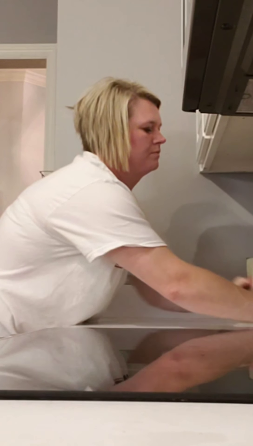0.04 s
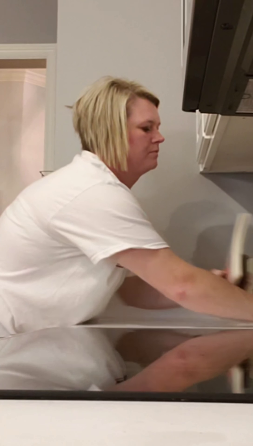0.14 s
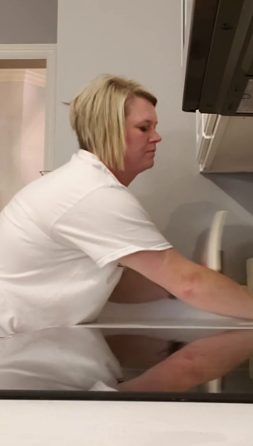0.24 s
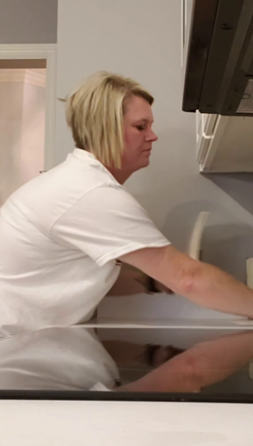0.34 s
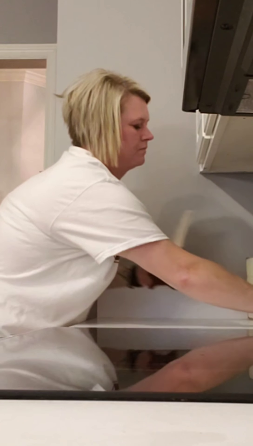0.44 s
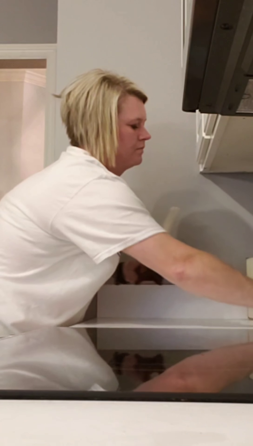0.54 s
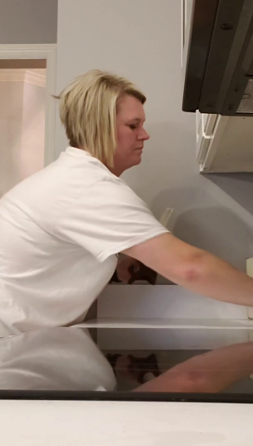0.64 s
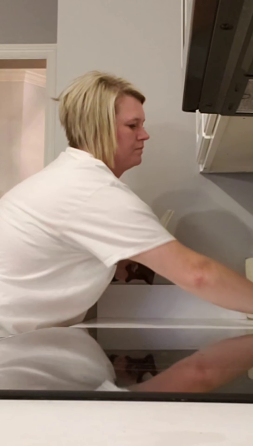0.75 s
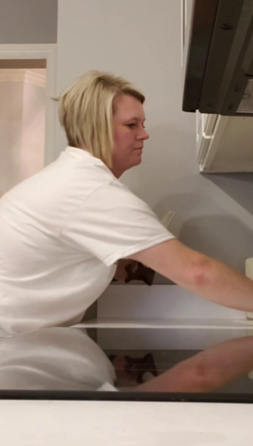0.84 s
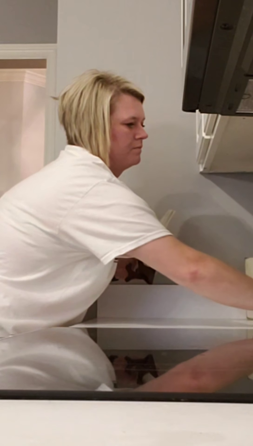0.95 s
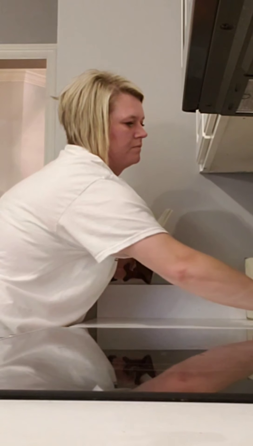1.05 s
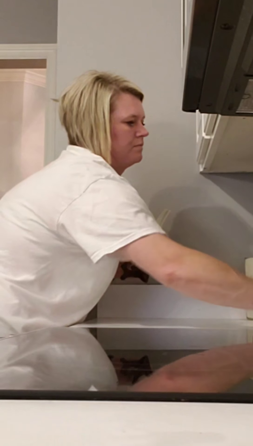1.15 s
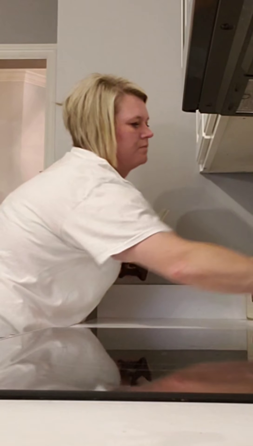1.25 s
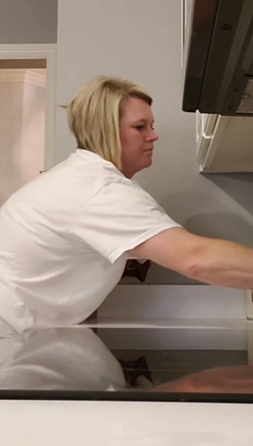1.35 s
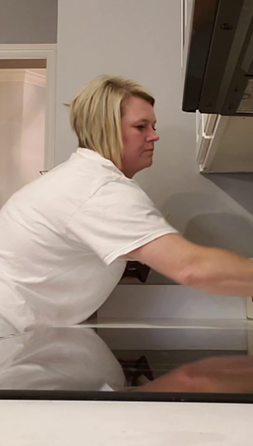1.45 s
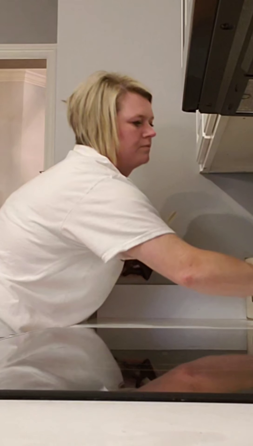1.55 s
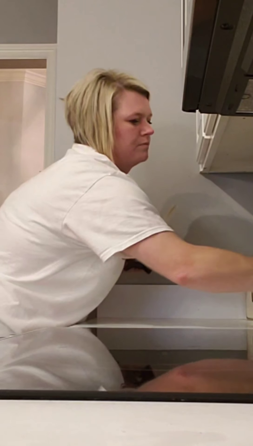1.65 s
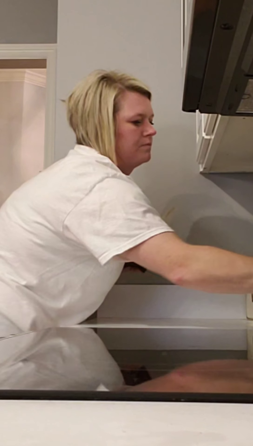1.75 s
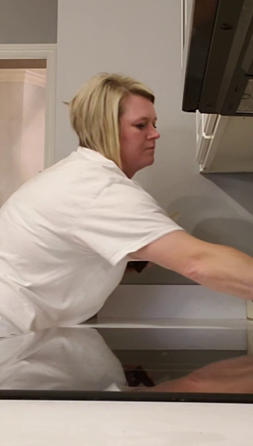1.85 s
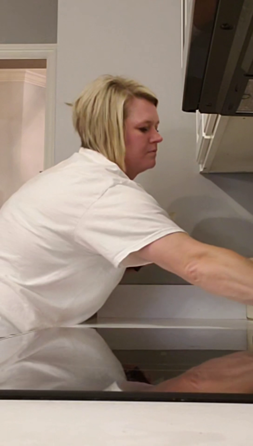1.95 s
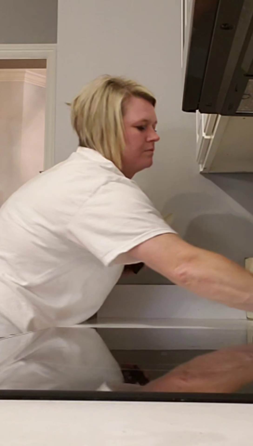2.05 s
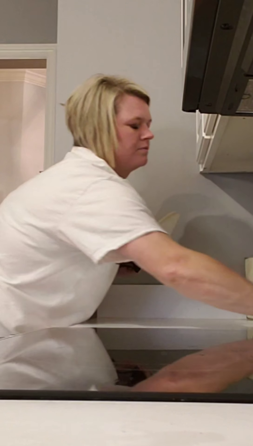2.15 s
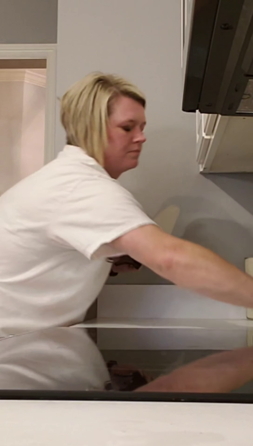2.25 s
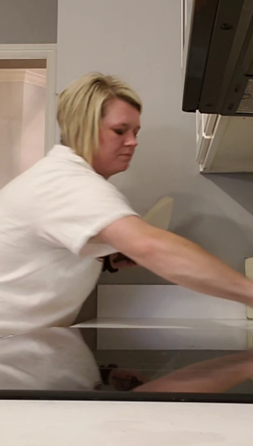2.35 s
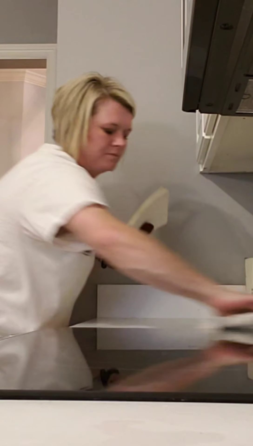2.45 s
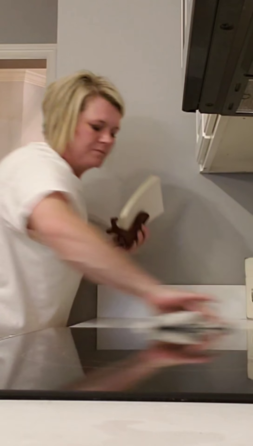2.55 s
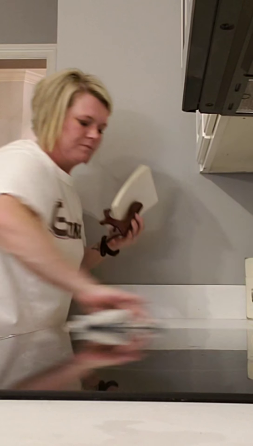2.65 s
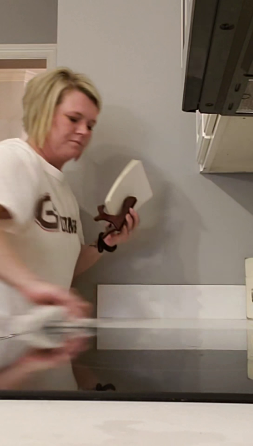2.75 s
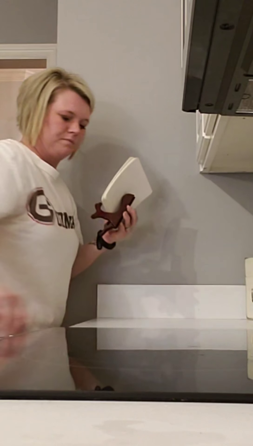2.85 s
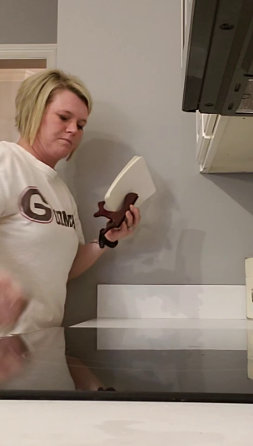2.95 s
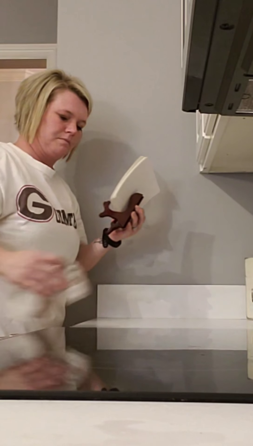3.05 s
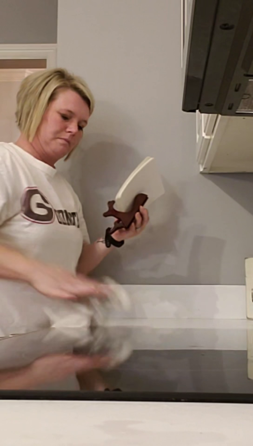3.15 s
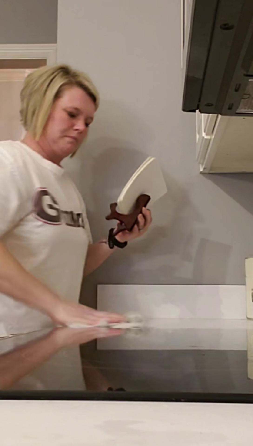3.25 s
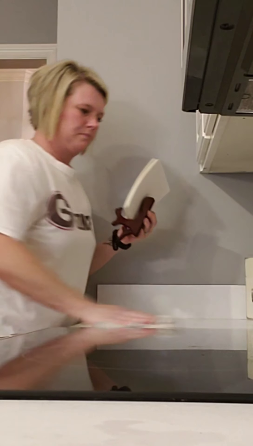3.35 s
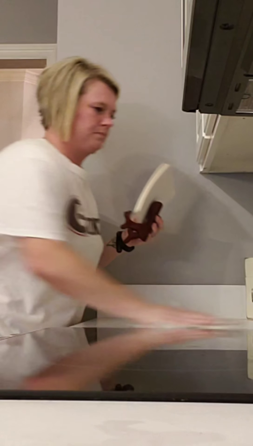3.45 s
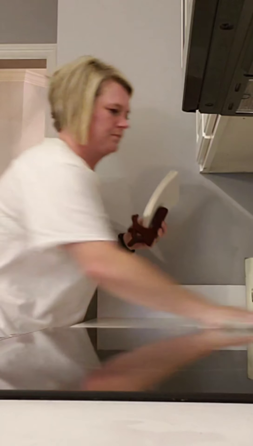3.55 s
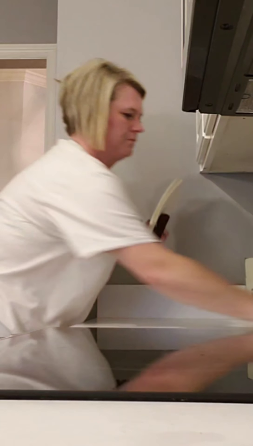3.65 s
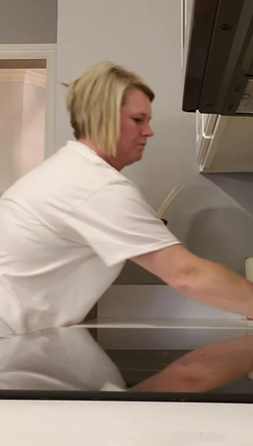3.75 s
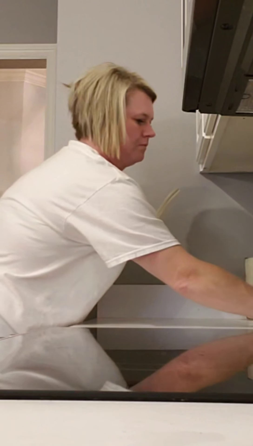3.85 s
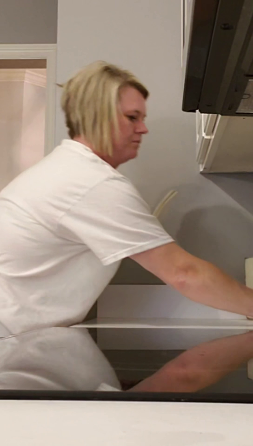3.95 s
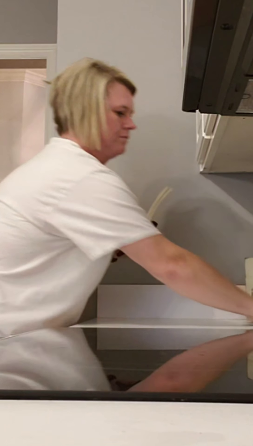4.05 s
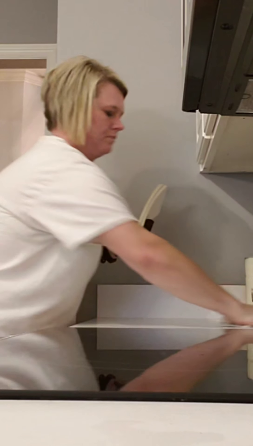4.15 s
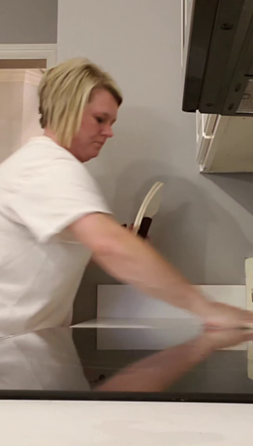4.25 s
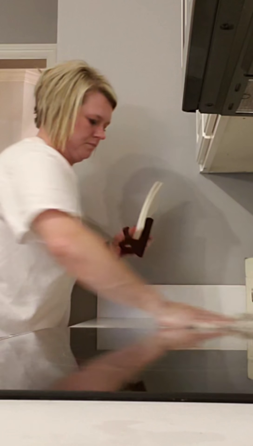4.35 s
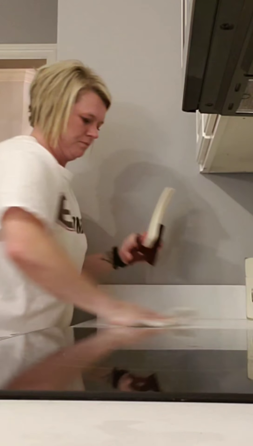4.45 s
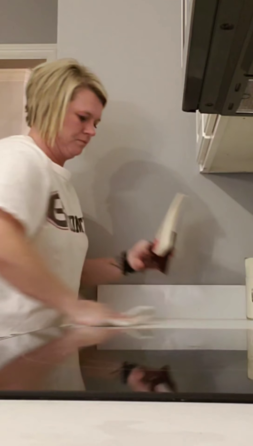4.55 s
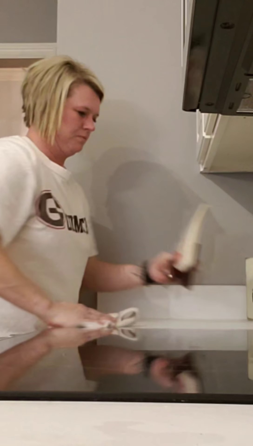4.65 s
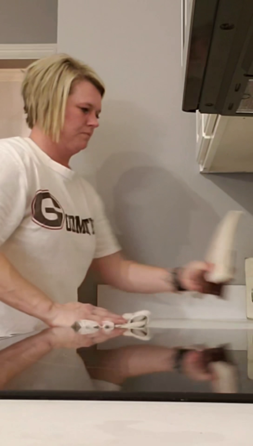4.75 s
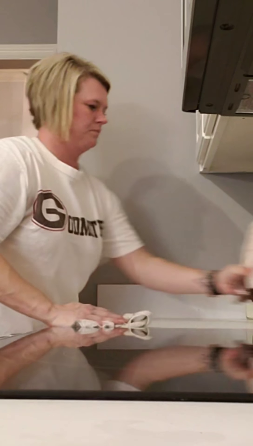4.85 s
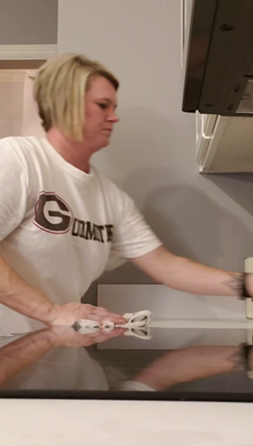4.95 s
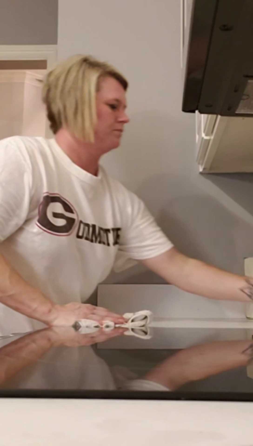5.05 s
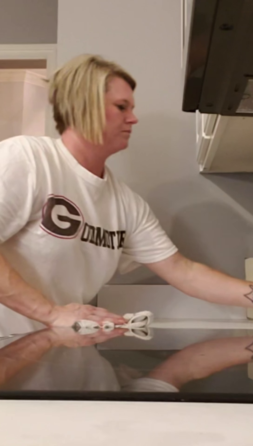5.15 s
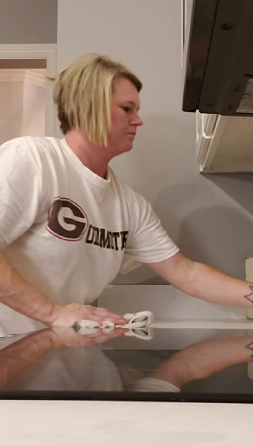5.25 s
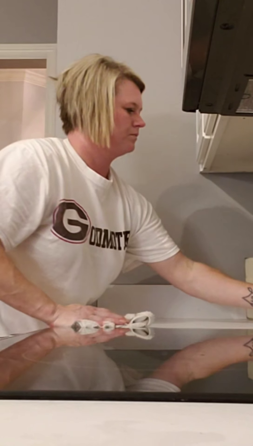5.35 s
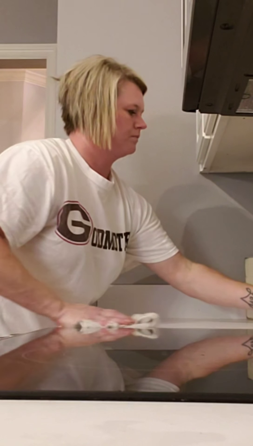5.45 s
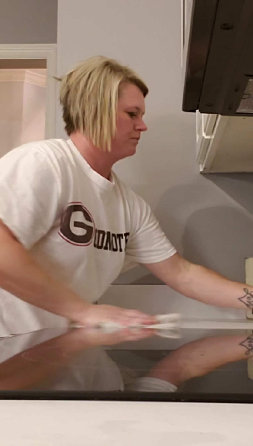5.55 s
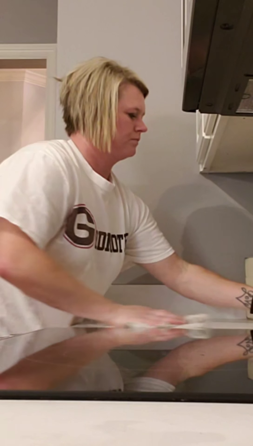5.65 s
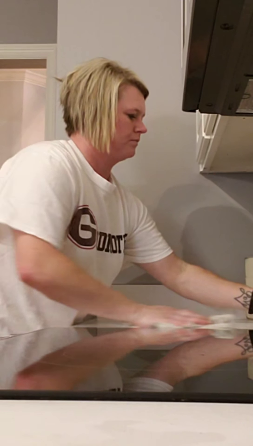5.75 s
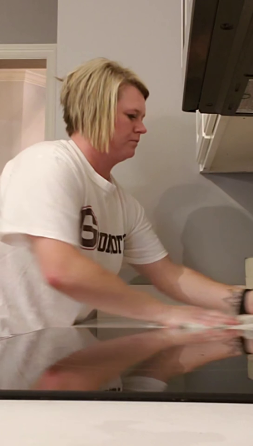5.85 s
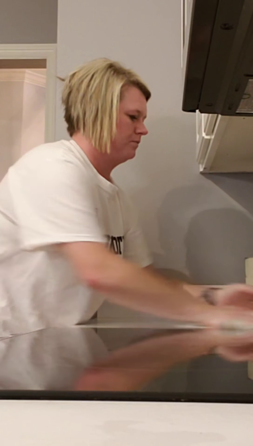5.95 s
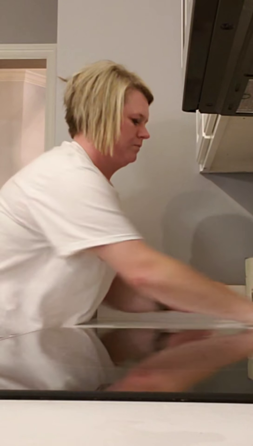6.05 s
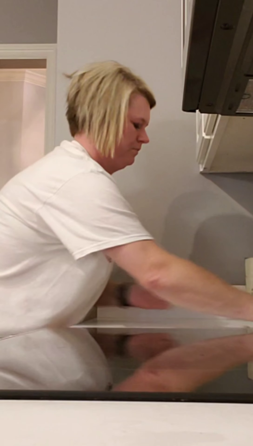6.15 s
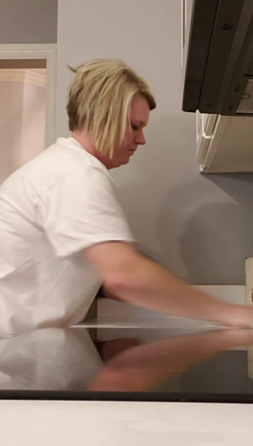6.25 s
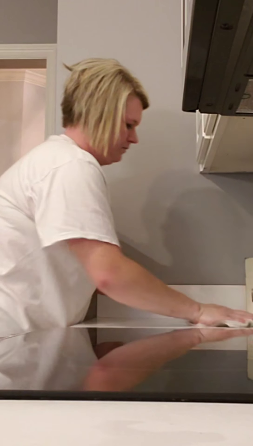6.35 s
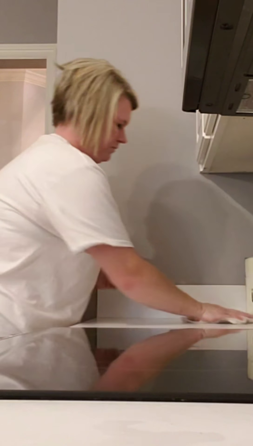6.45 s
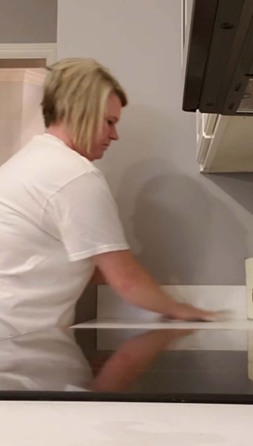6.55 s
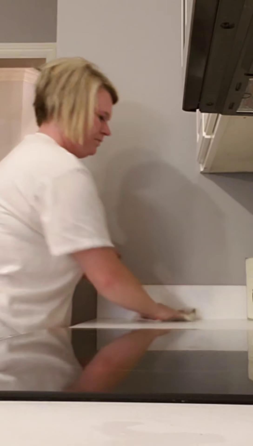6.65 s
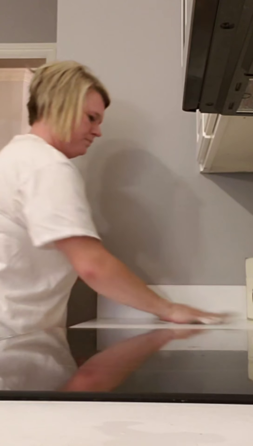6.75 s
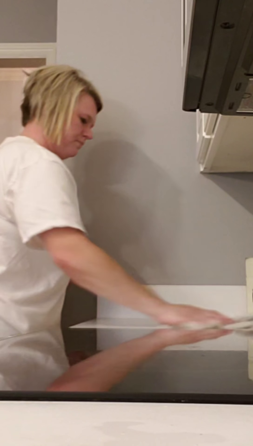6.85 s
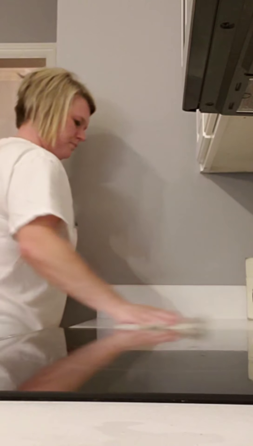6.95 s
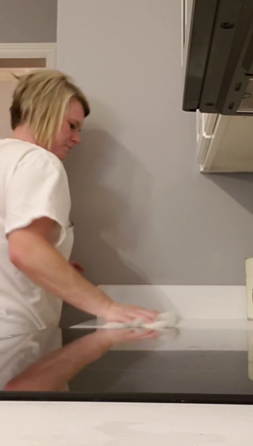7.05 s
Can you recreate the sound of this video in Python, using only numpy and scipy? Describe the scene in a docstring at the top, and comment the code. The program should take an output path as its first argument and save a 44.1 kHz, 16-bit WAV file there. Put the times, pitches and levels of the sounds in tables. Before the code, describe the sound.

A damp rag swishes to and fro over a countertop in uneven strokes, with a few soft squeaks and light bumps of the hand. About five seconds in, a heavy board is set down with one loud knock, then rocks briefly and settles. The wiping resumes. A refrigerator hums steadily throughout, and everything sounds nearby in a hard, slightly reverberant kitchen.

```python
"""A damp rag swishes to and fro over a kitchen countertop, above a refrigerator's steady hum.
The swish is friction noise: countless threads catch and slip, and now and then squeak softly.
A heavy board in a stand is set down with one loud knock, rocks and settles; these impacts, and light
bumps of the wiping hand, excite damped modes of board and counter, which reverberate in the hard room.
The refrigerator adds a line spectrum from its motor, broadband fan noise and a faint whine."""
import sys
import numpy as np
from scipy import signal
from scipy.fft import rfft, irfft, next_fast_len
from scipy.io import wavfile
from scipy.ndimage import uniform_filter1d, map_coordinates

SR = 44100
rng = np.random.default_rng(int(sys.argv[2]) if len(sys.argv) > 2 else 0)


def unload_audio(sound):
    """Save the sound as a 16-bit wav file, at the path given as the first command line argument."""
    columns = np.transpose(np.atleast_2d(sound))
    # keep every value between -1 and 1, then stretch to whole-number steps
    steps = np.round(np.clip(columns, -1, 1) * 32767)
    wavfile.write(sys.argv[1], SR, steps.astype(np.int16))


N = 312669

# partials of the refrigerator motor: f/Hz, rms level/dB
MOTOR_LINES = [(59.3, -59), (79.6, -60), (120, -45), (239.7, -55.5), (319.7, -63), (359.5, -65.5),
               (595.8, -67), (636, -74.5), (675, -71.5), (715.4, -68), (755, -70), (836.3, -73.5)]
# fan noise: f/Hz, relative level/dB
FAN_SPECTRUM = [(25, -34), (48, -31), (80, -10), (110, 2), (200, -3.5), (260, -8.5), (480, -11.5),
                (760, -17.5), (950, -21), (1200, -20), (1400, -31), (1800, -34), (6800, -33), (9000, -47),
                (15800, -47.5)]
# fan noise: f/Hz, left-right coherence
FAN_COHERENCE = [(130, 0.85), (300, 0.86), (700, 0.057), (1400, 0.027), (4000, 0.075)]
# fan noise: f/Hz, left minus right level/dB
FAN_BALANCE = [(100, 4), (700, 1), (1300, 4), (2400, 4.5), (7000, 6), (12000, -3)]
# noise bands of the refrigerator's whine: f/Hz, width/Hz, relative level/dB
WHINE_BANDS = [(2830, 270, -7), (3270, 100, -2), (3520, 110, -2)]
# reverberation time of the kitchen: f/Hz, T60/s
ROOM_DECAY = [(120, 0.4), (400, 0.69), (1500, 0.53), (3000, 0.47), (6000, 0.28), (14000, 0.19)]
# modes of board and counter: f/Hz, relative level/dB, T60/s
COUNTER_MODES = [(112, -17, .15), (183, -11, .15), (345, -21, .12), (392.5, 0, .115), (447, -22, .12),
                 (614, -6.5, .08), (664, -8, .11), (738, -12, .1), (843, -16, .1), (983, -15, .1),
                 (1150, -4.5, .075), (1295, -9, .075), (1502, -15, .07), (1598, -5, .075), (1680, -17, .09),
                 (1808, -12, .085), (1940, -23, .07), (2210, -21, .06), (2870, -22, .05), (3010, -22, .05),
                 (3260, -24, .05)]
# noise burst of an impact: f/Hz, relative level/dB
CRACK_SPECTRUM = [(80, -24), (180, -10), (280, -6), (420, -11), (700, 6.5), (950, -8.5), (1250, -1.5),
                  (1650, 1.5), (2100, -10.5), (3200, -10.5), (4200, -19), (5600, -16.5), (8000, -23.5),
                  (14000, -31.5)]
# impacts: t/s, ring gain/dB, ring tilt/(dB per octave), crack gain/dB, contact cut-off/Hz
# the hand bumps seven times; the board lands edge first, then flat (four rows), then rocks and settles
IMPACTS = [ (0.797, -48, -6, -48.5, 2000), (0.811, -38.5, -8, -41, 650), (0.838, -44.5, -9.5, -46, 600),
           (0.866, -52, -10, -40, 330), (2.811, -45, 4.5, -43.5, 1300), (2.889, -47, -1, -44.5, 900),
           (3.314, -47, -13, -62, 130), (5.1558, -22.5, 7, -24, 5000), (5.1572, -15, 6, -23.5, 15000),
           (5.1643, -13, -1, -27.5, 12000), (5.1717, -20.5, -1.5, -32, 6000), (5.221, -31, -2, -36, 1500),
           (5.249, -30.5, -6.5, -36, 2200), (5.269, -31, 2, -29.5, 2600), (5.62, -39, 6, -44, 1800),
           (5.765, -41, 3.5, -58, 950)]
# squeaks of damp cloth: centre t/s, f/Hz, level/dB, 1/e half-length/s
CLOTH_SQUEAKS = [(1.402, 3430, -56, 0.017), (1.532, 2230, -58, 0.054), (1.53, 3300, -76, 0.053),
                 (3.304, 3400, -56.5, .025), (6.35, 3400, -60, .03)]
# strokes of the rag: start t/s, length/s, rise/s, swell/dB, scrape gain/dB, hiss gain/dB, rub gain/dB
RAG_STROKES = [(-0.048, 0.38, 0.06, -1.5, -56.0, -60.5, -58), (0.402, 0.17, 0.121, -1, -60.0, -63, -60.5),
               (0.628, 0.167, 0.066, 0.0, -79, -77.0, -74), (0.737, 0.13, 0.056, -0.0, -64.5, -67, -64),
               (0.858, 0.29, 0.071, -1.5, -61.5, -62.0, -60.0), (1.388, 0.2, 0.073, 3, -53.5, -56.5, -60.5),
               (1.865, 0.047, 0.05, 0.0, -61, -65.5, -59.0), (1.936, 0.3, 0.13, 4.5, -58.5, -61, -60.5),
               (2.284, 0.3, 0.1, -0.5, -56, -55.5, -65.5), (2.534, 0.338, 0.059, 1.5, -55.5, -56.5, -59),
               (3.293, 0.45, 0.11, 5, -57, -59.0, -60.0), (3.742, 0.21, 0.038, 7.5, -57.0, -57.5, -60),
               (3.93, 0.21, 0.052, -0.5, -56.5, -62, -60.0), (4.119, 0.27, 0.059, 3.5, -57, -56.5, -60),
               (4.378, 0.24, 0.1, -2, -55, -53.5, -59.0), (4.597, 0.19, 0.045, 3.5, -62.0, -61.5, -70),
               (5.465, 0.38, 0.073, 10, -62.0, -63.0, -67.5),
               (5.855, 0.313, 0.054, -0.5, -60.5, -61.0, -62.5), (6.21, 0.49, 0.071, 2, -57, -61.5, -60.5),
               (6.708, 0.278, 0.078, -3, -53.5, -57.5, -55.5), (6.966, 0.14, 0.082, 1, -58.5, -59.5, -67.5)]
# height of the arch at mid-stroke, where the hand is fastest: scrape/dB, hiss/dB, rub/dB
STROKE_ARCH = [2.5, 3.1, 1.7]
# scrape of the threads: f/Hz, relative level/dB
SCRAPE_SPECTRUM = [(1200, -54), (2200, -9), (3200, -1), (4600, 1), (6000, -3), (7200, -7), (9000, -18.5),
                   (15000, -26)]
# hiss of the fibres: f/Hz, relative level/dB
HISS_SPECTRUM = [(4000, -18), (7000, 0), (9200, -5), (11000, -1.5), (12800, 0.5), (14300, -2),
                 (15800, -7.5)]
# dull rub of the pressing hand: f/Hz, relative level/dB
RUB_SPECTRUM = [(250, 4.5), (600, 3.5), (1100, 3), (1600, 1.5), (2200, 3.5), (3000, -4), (4500, -20)]
# friction noise of the rag: f/Hz, left-right coherence
RAG_COHERENCE = [(300, 0.72), (700, 0.29), (1400, -0.2), (3100, -0.074), (6800, -0.11), (13000, 0.37)]

RELEASE_T60_S = 0.34  # a stroke dies away as the hand stops or turns
BAND_LIMIT_HZ = 15780


def amp(db):
    """Amplitude ratio of a level in decibels."""
    return 10 ** (np.asarray(db) / 20)


def unit(x):
    """Normalisation to rms 1."""
    return x / np.sqrt(np.mean(x ** 2) + 1e-20)


def along(points, hz):
    """Interpolation of (f/Hz, value) points on a logarithmic frequency axis."""
    f, v = np.transpose(points)
    return np.interp(np.log(hz + 1), np.log(f), v)


def wobble(rate):
    """Slow random modulation: a spline through `rate` knots a second."""
    return map_coordinates(rng.standard_normal(int(N * rate / SR) + 4), [np.arange(N) * rate / SR])


def filtered(x, response):
    """Linear filtering: the spectrum is multiplied by a frequency response."""
    n = x.shape[-1]
    m = next_fast_len(n + 8192)
    return irfft(rfft(x, m) * response(np.fft.rfftfreq(m, 1 / SR)), m)[..., :n]


def pan(left_db):
    """Left and right gains for an interchannel level difference."""
    return amp(np.array([[.5], [-.5]]) * left_db)


def spread(pair, spectrum, coherence):
    """Mid-side mixing turns two independent noises into coloured, partly coherent stereo of rms 1."""
    def response(hz):
        angle = np.arccos(np.clip(along(coherence, hz), -1, 1)) / 2
        return amp(along(spectrum, hz)) * [np.cos(angle), np.sin(angle)]
    mid, side = filtered(pair, response)
    return unit(np.array([mid + side, mid - side]))


def refrigerator():
    """Superposition of wavering motor partials, broadband fan noise and a narrow-band whine."""
    t, hum = np.arange(N) / SR, np.zeros(N)
    for hz, db in MOTOR_LINES:
        peak = np.sqrt(2) * amp(db + 0.9 * wobble(4.5))
        hum += peak * np.sin(2 * np.pi * (hz * t + rng.random()) + 0.15 * wobble(2.0))
    fan = spread(rng.standard_normal((2, N)), FAN_SPECTRUM, FAN_COHERENCE)
    fan = filtered(fan, lambda hz: pan(along(FAN_BALANCE, hz)))
    peaks = lambda f: sum(amp(db) / (1 + (2 * (f - hz) / width) ** 2) for hz, width, db in WHINE_BANDS)
    whine = unit(filtered(rng.standard_normal((2, N)), peaks)) * amp(wobble(6.5))
    return hum * pan(3.4) + amp(-47.0) * fan + amp(-67.5) * whine * pan(6.1)


def room(x, wet_db):
    """Reverberation: a diffuse tail builds up after the direct sound; each band decays at its own rate."""
    hz, t, noise = signal.stft(rng.standard_normal((2, SR // 2 + SR // 4)), SR, nperseg=256)
    build_up = 1 - np.exp(-(t / .018) ** 2)
    decay = amp(-60 * t / along(ROOM_DECAY, hz)[:, None])
    tail = signal.istft(noise * decay * build_up, SR, nperseg=256)[1]
    tail = spread(tail, [(100, 0), (10000, 0.0054)], coherence=[(200, 0.92), (700, 0.72), (2000, 0.041)])
    tail /= np.linalg.norm(tail[0])
    return x + amp(wet_db) * signal.fftconvolve(x, tail, axes=1)[:, :x.shape[1]]


def knocks():
    """Impact excitation of damped modes: hard edges ring and crack, a flat landing or the hand thuds."""
    out, t = np.zeros((2, N + SR)), np.arange(SR // 2) / SR
    hz, mode_db, t60 = np.transpose(COUNTER_MODES)[:, :, None]
    octaves = np.log2(np.clip(hz, 160, 1700) / 700)
    # high modes arrive out of phase left and right; low ones lean to the left
    side = np.array([.5, -.5])[:, None, None]
    phase = side * np.minimum(hz / 1700 + .33, 2)
    balance_db = side * along([(400, 3.2), (1200, .7)], hz)
    attack = 1 - np.exp(-t / 0.0013)
    vibration = np.sin(2 * np.pi * hz * t + phase) * attack
    for start, ring_db, tilt_db, crack_db, cutoff_hz in IMPACTS:
        modes = amp(mode_db + tilt_db * octaves + balance_db - 60 * t / t60) * vibration
        ring = room(modes.sum(axis=0 + 1), wet_db=-17.5)
        noise = rng.standard_normal((2, len(t)))
        crack = spread(noise, CRACK_SPECTRUM, coherence=[(400, 0.77), (1600, 0.48), (5000, 0.17)])
        crack = room(crack * amp(-60 * t / 0.054), wet_db=-6)
        blow = amp(ring_db) * ring + amp(crack_db) * crack
        # a soft contact lasts longer and leaves the treble out
        contact = signal.butter(2, cutoff_hz, fs=SR, output="sos")
        out[:, round(start * SR):][:, :len(t)] += signal.sosfilt(contact, blow)
    # the knocks carry little deep bass below about 90 Hz
    bass_cut = signal.butter(3, 90, "high", fs=SR, output="sos")
    return signal.sosfilt(bass_cut, out[:, :N])


def squeaks():
    """Stick-slip motion of damp cloth narrows the friction noise to a fuzzy note."""
    t, out = np.arange(N) / SR, np.zeros((2, N))
    for centre, hz, db, half_length in CLOTH_SQUEAKS:
        note = unit(filtered(rng.standard_normal((2, N)), lambda f: 1 / (1 + ((f - hz) / 110) ** 2)))
        out += amp(db) * np.exp(-((t - centre) / half_length) ** 2) * note
    return out


def cloth_folds(pair, depth_db):
    """Spectral modulation: folds of cloth favour frequencies that shift as the hand moves."""
    spectra = signal.stft(pair, nperseg=512)[2]
    patches = uniform_filter1d(rng.standard_normal(spectra.shape[1:]), size=4, axis=0)  # over frequency
    patches = uniform_filter1d(patches, size=12, axis=1)  # over time
    return signal.istft(spectra * amp(depth_db * unit(patches)), nperseg=512)[1][:, :N]


def friction(spectrum, catches_per_s, scatter_db, sliding, folds_db):
    """Shot noise of threads catching at random, added to the Gaussian noise of smooth sliding."""
    catches = (rng.random((2, N)) < catches_per_s / SR) * rng.standard_normal((2, N))
    catches *= amp(scatter_db * rng.standard_normal((2, N)))
    noise = unit(catches) + sliding * rng.standard_normal((2, N))
    return spread(cloth_folds(noise, folds_db), spectrum, RAG_COHERENCE)


def stroke_gains():
    """Envelopes of scrape, hiss and rub: friction noise grows with speed, and strokes add in power."""
    t, power = np.arange(N) / SR, np.zeros((3, N))
    for start, length, rise, swell_db, *layer_db in RAG_STROKES:
        heard = (t > start) & (t < start + length + RELEASE_T60_S)
        age = t[heard] - start
        travel = np.clip(age / length, 0, 1)
        arch_db = np.outer(STROKE_ARCH, np.sin(np.pi * travel) - 1)
        release_db = -60 * np.maximum(age - length, 0) / RELEASE_T60_S
        level_db = np.array(layer_db)[:, None] + arch_db + swell_db * (travel - .5) + release_db
        power[:, heard] += (np.clip(age / rise, 0, 1) * amp(level_db)) ** 2
    return np.sqrt(power)


def rag():
    """Sliding friction in three bands, amplitude-modulated by the strokes and the hand's uneven speed."""
    scrape_gain, hiss_gain, rub_gain = stroke_gains()
    uneven_db = 0.5 * wobble(28)
    scrape = friction(SCRAPE_SPECTRUM, catches_per_s=5000, scatter_db=2, sliding=1.6, folds_db=1.7)
    scrape *= scrape_gain * amp(3.5) * pan(2.3)
    hiss = friction(HISS_SPECTRUM, catches_per_s=6000, scatter_db=5.5, sliding=1.5, folds_db=1.0)
    hiss *= hiss_gain * amp(2.0) * pan(-3.0)
    rub_db = 4.0 + 1.8 * wobble(13)
    rub = friction(RUB_SPECTRUM, catches_per_s=1800, scatter_db=3.5, sliding=2.1, folds_db=1.0)
    rub *= rub_gain * amp(rub_db) * pan(-.3)
    return amp(uneven_db) * (scrape + hiss + rub)


def scene():
    """Superposition: the sound pressures of all sources add."""
    return rag() + squeaks() + knocks() + refrigerator()


def record(dry):
    """An ideal low-pass filter removes everything above the band limit."""
    return filtered(dry, lambda hz: hz < BAND_LIMIT_HZ)


dry = scene()
out = record(dry)
unload_audio(out)
```